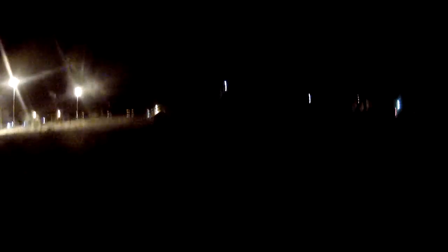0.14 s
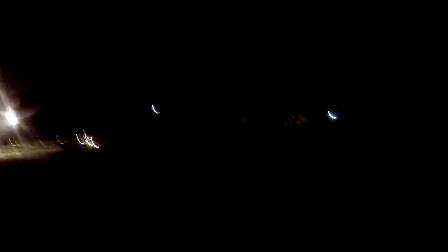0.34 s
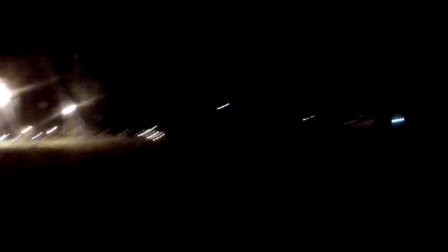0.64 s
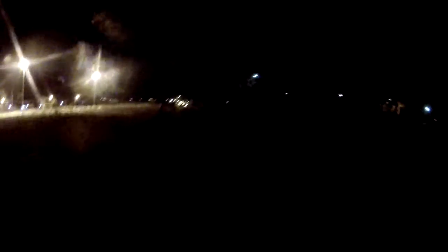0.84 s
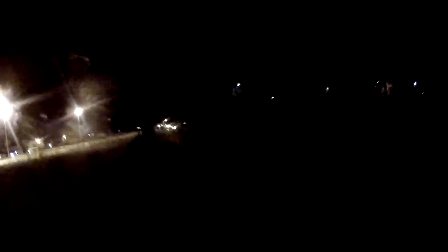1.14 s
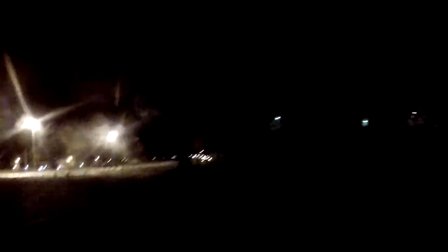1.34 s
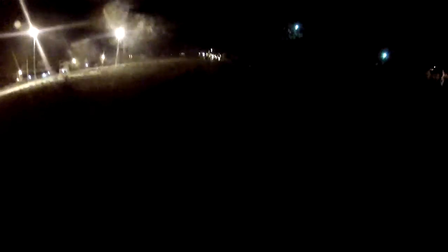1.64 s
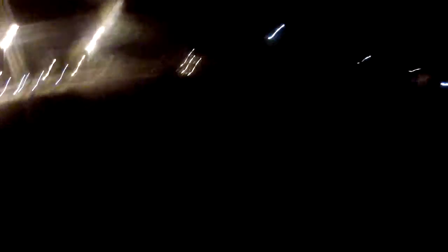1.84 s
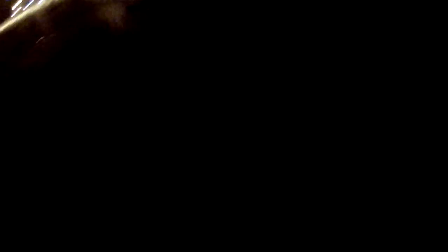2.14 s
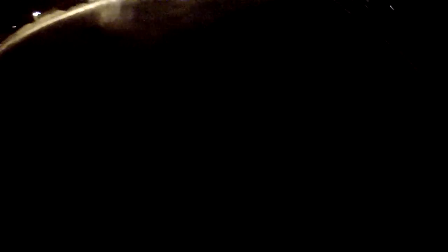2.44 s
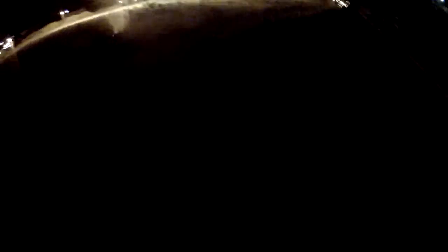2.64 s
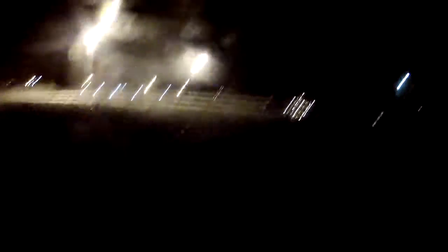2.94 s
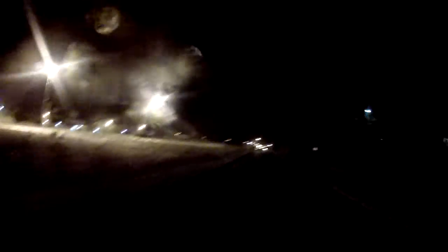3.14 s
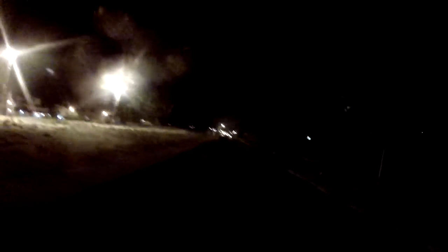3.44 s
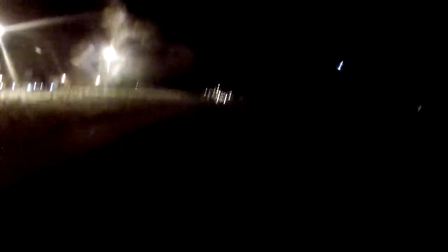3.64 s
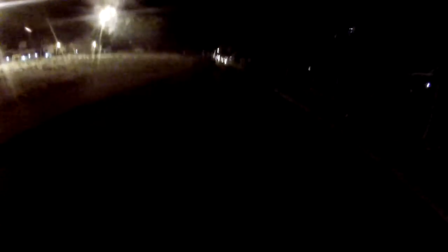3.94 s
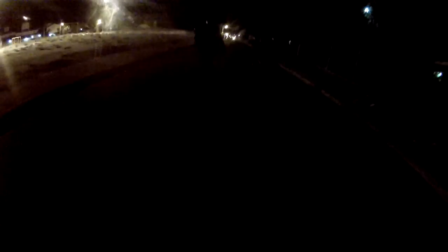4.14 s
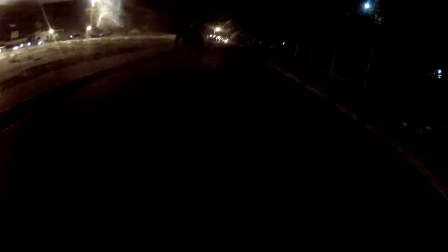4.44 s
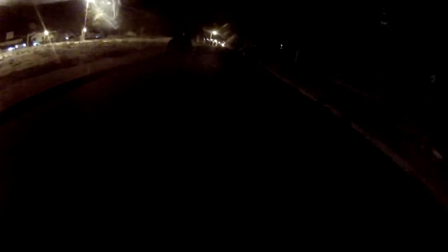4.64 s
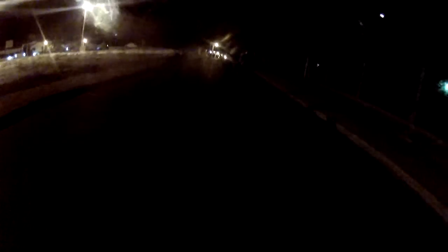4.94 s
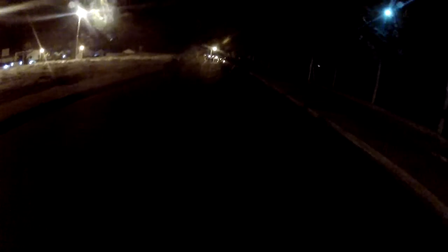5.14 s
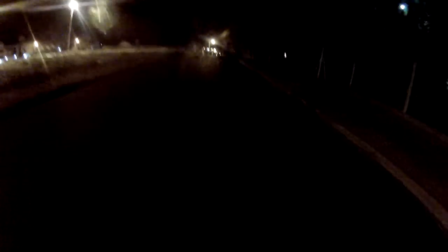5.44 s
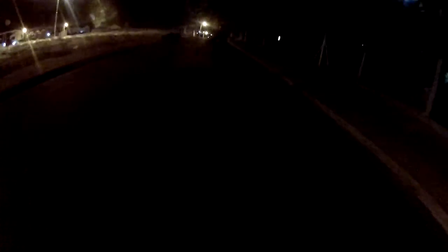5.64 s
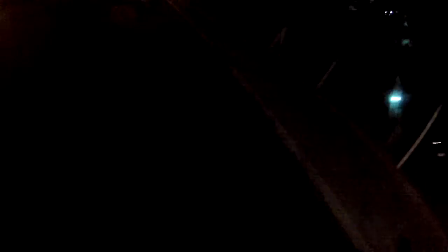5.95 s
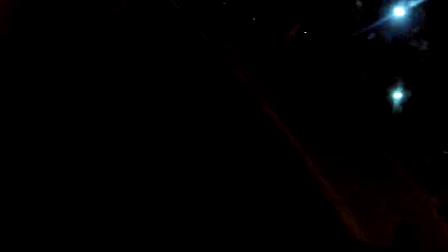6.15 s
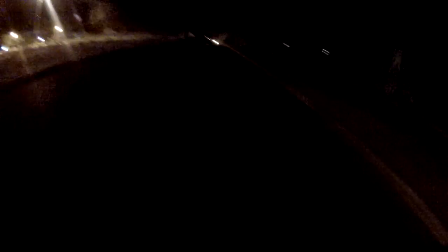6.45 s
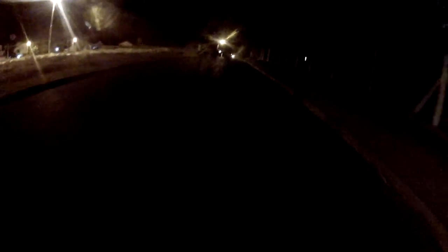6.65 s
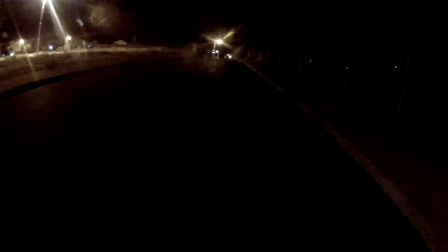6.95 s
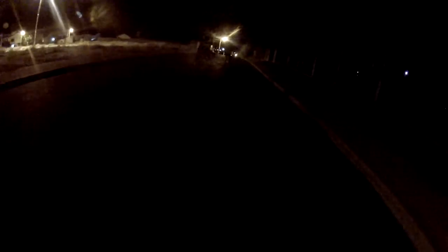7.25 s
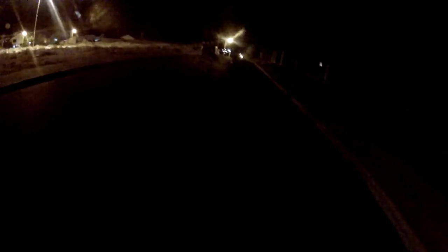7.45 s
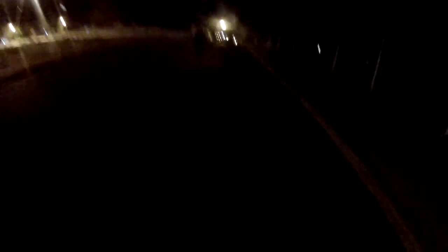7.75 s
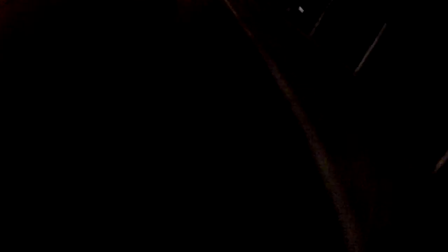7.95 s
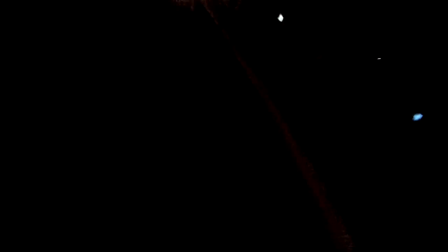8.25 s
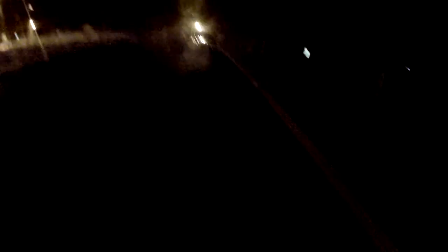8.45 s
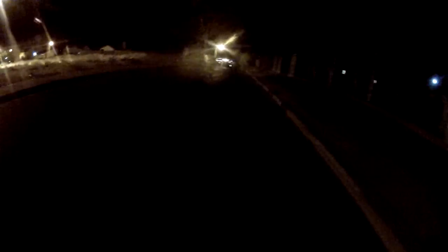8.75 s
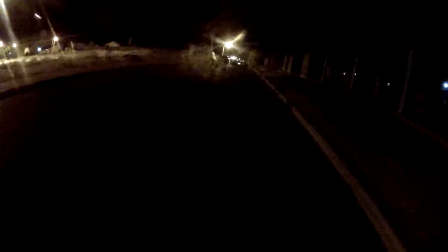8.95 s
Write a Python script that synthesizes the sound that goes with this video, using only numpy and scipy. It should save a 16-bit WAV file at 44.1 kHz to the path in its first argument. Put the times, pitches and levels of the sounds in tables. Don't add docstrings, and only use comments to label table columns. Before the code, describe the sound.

Longboard wheels hum steadily over asphalt while early bumps thump and clack a sealed plastic camera housing, wind rumbling low, with harsh overloaded sound.

```python
import sys
import numpy as np
from scipy import signal
from scipy.fft import rfft, irfft, next_fast_len
from scipy.io import wavfile
from scipy.ndimage import uniform_filter1d

SR = 44100
rng = np.random.default_rng(int(sys.argv[2]) if len(sys.argv) > 2 else 0)


def generate_wav(sig):
    pcm = np.round(np.clip(np.atleast_2d(sig).T, -1, 1) * 32767).astype(np.int16)
    wavfile.write(sys.argv[1], SR, pcm)


def volts_from_db(level):
    exponent = np.asarray(level, float) / 20
    return 10 ** exponent


N = 400869

# (f/Hz, level/dB, time to fall 60 dB/s)
LOW_MODES = [(425, 5, 0.016), (524, 2.5, 0.024), (730, 0, 0.024), (1004, -0.5, 0.025)]
MID_MODES = [(1342, -7, 0.023), (1623, 0.5, 0.015), (1933, 6.5, 0.012), (2295, -2, 0.014)]
HIGH_MODES = [(2547, 10.4, 0.0057), (3250, 0.42, 0.015), (3580, 1.8, 0.011)]
# (t/s, door level/dB, door f/Hz, shell level/dB, hollowness/dB)
SLAMS = [
    (0.2752, 4.5, 272, -10, -4),
    (0.3378, -9.5, 260, -19, 8),
    (1.0238, 3, 266, -12, -0.5),
    (1.1223, 2.5, 262, -12.5, 5.5),
    (1.9023, -2.5, 255, -12.5, -4),
    (3.0152, -3.5, 257, -10, 6.5),
]


def rms_one(x):
    return x / np.sqrt(np.mean(x ** 2) + 1e-20)


def drift(rate):
    r = np.exp(-80 * np.pi * rate / SR)
    noise = rng.standard_normal(N // 40 + 2002)
    slow = signal.lfilter([1], [1, -2 * r, r * r], noise)[2000:]
    return np.interp(np.arange(N) / 40, np.arange(len(slow)), rms_one(slow))


def coloured(source, spectrum):
    size = next_fast_len(N)
    hz, level_db = np.transpose(spectrum)
    bins_hz = np.arange(size // 2 + 1) * SR / size
    shape_db = np.interp(np.log(bins_hz + 1e-9), np.log(hz), level_db, -120, -120)
    return rms_one(irfft(rfft(source, size) * volts_from_db(shape_db), size)[:N])


def ring(force, hz, t60):
    r, w = volts_from_db(-60 / (t60 * SR)), 2 * np.pi * hz / SR
    return signal.lfilter([0, np.sin(w)], [1, -2 * r * np.cos(w), r * r], force + 1e-18)


def shell(force, modes, cut_hz):
    rings = sum(volts_from_db(level_db) * ring(force, hz, t60) * (-1) ** k for k, (hz, level_db, t60) in enumerate(modes))
    return signal.sosfilt(signal.butter(8, cut_hz, fs=SR, output="sos"), rings)


def crackles(count, length_s):
    t = np.arange(2048) / SR
    length_s = np.reshape(length_s, (-1, 1))
    after = rng.standard_normal((count, len(t))) * np.exp(-t / length_s) * (1 - np.exp(-t / 0.00018))
    return (t == 0) + 0.19 * after


def add(out, times, levels_db, sounds):
    for s, level_db, sound in zip(times, levels_db, sounds):
        part = out[round(s * SR):round(s * SR) + len(sound)]
        part += (volts_from_db(level_db) * sound / np.max(np.abs(sound)))[:len(part)]


def soft_blows(rows, rise_s):
    out, t = np.zeros(N + SR), np.arange(SR // 2) / SR
    for s, level_db, hz, t60, *push in rows:
        swing = np.sin(2 * np.pi * hz * t) * volts_from_db(level_db - 60 * t / t60)
        swing *= 1 - np.exp(-t / rise_s)
        swing *= 1 + sum(push) * np.exp(-t / 0.0053)
        out[round(s * SR):round(s * SR) + len(t)] += swing
    return out[:N]


def in_time(rows):
    s, *columns = np.transpose(rows)
    return [np.interp(np.arange(N) / SR, s, c) for c in columns]


def swells(rows):
    return sum(db * np.exp(-((np.arange(N) / SR - s) / width_s) ** 2) for s, db, width_s in rows)


def road(grains_per_s, spread_db, patchy_db):
    sizes = volts_from_db(spread_db * np.minimum(rng.exponential(1, N), 5)) * rng.choice([-1, 1], N)
    return sizes * (rng.random(N) < grains_per_s / SR) * volts_from_db(patchy_db * drift(16.4))


def ride():
    # (t/s, wheel load as hum level/dB, rubbing on the shell level/dB)
    course = [(0.0, -47.5, -51.5), (0.45, -47, -56), (1.21, -48, -52.5), (1.64, -51, -52),
              (2.1, -43, -53.5), (2.58, -44, -57.5), (2.88, -48, -57), (3.37, -47, -42), (3.5, -47, -46.5),
              (3.75, -47, -52.5), (4.23, -44.5, -55.5), (4.91, -43.5, -55.5), (5.69, -44, -55.5),
              (6.13, -40, -53), (7.01, -42, -53.5), (7.37, -45, -53), (7.95, -43.5, -54.5),
              (9.09, -46, -53)]
    # (t/s, level/dB, half width/s)
    strokes = [
        (.75, 4, 0.15),
        (1.5, 5, 0.11),
        (3.3, -2, .04),
        (3.385, 1.5, 0.042),
        (3.46, 1, 0.024),
        (3.61, 1.5, 0.044),
    ]
    hum_db, rub_db = in_time(course)
    rub_db = rub_db + swells(strokes)
    early_rub_db = np.roll(rub_db, -int(0.098 * SR))
    top_db = -65.5 + 0.63 * (early_rub_db - rub_db.mean()) + 0.24 * (hum_db - hum_db.mean())
    return hum_db, rub_db, top_db


def wind():
    # (t/s, level/dB)
    gusts = [(1.97, -33), (2.1, -30), (2.2, -41), (2.5, -47), (3.05, -38), (3.31, -43), (3.56, -42),
             (4.28, -51), (5.29, -47.5), (5.86, -51.5), (6.13, -45), (6.27, -49.5), (6.85, -44.5),
             (7.34, -43), (7.47, -50.5), (8.04, -40), (8.23, -48.5), (9.09, -44.5)]
    # (f/Hz, level per Hz/dB)
    rumble = [(15, -44), (28, -3), (60, 1.5), (85, -4.5), (115, -13), (170, -20), (260, -17.5)]
    return volts_from_db(in_time(gusts)[0] - 1.0 + 4.7 * drift(15.0)) * coloured(rng.standard_normal(N), rumble)


def rubbing(rub_db):
    # (f/Hz, level per Hz/dB)
    upper = [(1350, -7), (1550, -7.5), (1920, -0.5), (2150, -3.5), (2600, -5.5), (2900, -12)]
    lower = [(600, 1), (830, -4.5), (1050, 4), (1200, -1.5), (1350, 0), (1550, -48), (1700, -42)]
    grit = road(9000, 1.9, 1.56)
    return volts_from_db(rub_db - 1.34) * coloured(grit, upper) + volts_from_db(-57.5 + 0.51 * (rub_db + 56.0)) * coloured(grit, lower)


def top_hiss(top_db):
    # (f/Hz, level per Hz/dB)
    treble = [(2600, -27), (2950, -1), (3340, -0.5), (3750, -2.5), (4200, -12.5), (4400, -8)]
    return volts_from_db(top_db + 0.95) * coloured(road(9000, 3.7, 0.73), treble)


def bearings(hum_db, top_db):
    # (t/s, level/dB, half width/s)
    carves = [
        (6.15, 3, 0.33),
        (8.16, 2.5, .15),
    ]
    # (f/Hz, level per Hz/dB)
    bright = [(4000, -22), (4300, -19), (4600, -8), (5050, -5.5), (5300, -2.5), (5480, -3), (6000, -1)]
    level_db = -70.5 + swells(carves) + 0.5 * (hum_db + 47.5) + 0.57 * (top_db + 68)
    return volts_from_db(level_db) * coloured(road(9000, 2.1, 1.2), bright)


def deck_note(hz, waver_db, waver_rate):
    t60_s = 0.038
    note = rms_one(ring(ring(road(4000, 1.86, 1.0), hz, t60_s), hz, t60_s))
    stray = np.cumsum(0.015 * drift(.8))
    place = np.arange(N) + stray - np.linspace(stray[0], stray[-1], N)
    return np.interp(place, np.arange(N), note, period=N) * volts_from_db(waver_db * drift(waver_rate))


def wheels():
    # (f/Hz, level per Hz/dB)
    broad = [(130, -19), (200, -13), (250, -8.5), (275, -9), (340, -7), (375, -7), (450, -9), (530, -6),
             (570, -10), (740, -15), (810, -25), (950, -20.5)]
    # (f/Hz, level over the broad hum/dB)
    neighbours = [(350, -12), (520, -15)]
    ridge_hz, ridge_t60_s = 1920, 0.012
    grains = road(4000, 2.3, 0.6)
    deck = volts_from_db(-1) * deck_note(447, 0.54, 7.9)
    deck = deck + sum(volts_from_db(db) * deck_note(hz, 3.9, 1.04) for hz, db in neighbours)
    ridge = rms_one(ring(ring(grains, ridge_hz, ridge_t60_s), ridge_hz, ridge_t60_s))
    return rms_one(coloured(grains, broad) + deck + volts_from_db(-19.5) * ridge)


def ducking(bumps, depth, release_db_s):
    over_db = np.maximum(20 * np.log10(np.abs(bumps) + 1e-9) + 14, 0)
    slope = release_db_s * np.arange(N) / SR
    held_db = np.maximum.accumulate(over_db + slope) - slope
    return volts_from_db(-depth * uniform_filter1d(held_db, size=200))


def rattle(bumps):
    shake = np.abs(uniform_filter1d(np.abs(np.gradient(bumps)) * SR / 1000, size=200)) ** 0.76
    force = volts_from_db(-41) * shake * road(700, 3, 2)
    low, mid = shell(force, LOW_MODES, 1100), shell(force, MID_MODES, 2730)
    return low + volts_from_db(-2) * mid + volts_from_db(-3.5) * shell(force, HIGH_MODES, 5100)


def ticks():
    # (t/s, peak level/dB)
    events = [(0.24, -50), (0.272, -40), (0.2764, -35), (0.298, -41), (0.311, -47), (0.3397, -32),
              (0.3455, -42), (0.389, -50), (0.407, -50), (0.4304, -40), (0.437, -45), (0.4788, -46),
              (0.492, -48), (0.5935, -42), (1.0195, -44), (1.0261, -33), (1.034, -42), (1.044, -48),
              (1.0535, -42), (1.0864, -37), (1.112, -38), (1.1175, -38), (1.1774, -43), (1.3029, -44),
              (1.316, -46), (1.339, -48), (1.598, -44), (1.624, -44), (1.647, -40), (1.66, -43),
              (1.678, -42), (1.7456, -40), (1.829, -46), (1.8944, -39), (1.908, -35), (1.925, -39),
              (1.953, -45), (1.9655, -34), (2.2763, -38), (2.934, -55), (3.007, -47), (3.022, -31),
              (3.4476, -45), (3.6681, -44), (3.743, -36), (4.128, -51)]
    # (f/Hz, level/dB, time to fall 60 dB/s)
    modes = [(4650, 7.5, 0.0027), (5210, 9, 0.0039), (5820, -5, 0.028)]
    s, peak_db = np.transpose(events)
    out, thin = np.zeros(N), signal.butter(3, 3900, "high", fs=SR, output="sos")
    add(out, s, peak_db - .6, signal.sosfilt(thin, shell(crackles(len(s), 0.0028), modes, 7000)))
    return out


def flicks():
    # (t/s, peak level/dB, dullness as tilt toward the low notes/dB per octave)
    events = [
        (0.456, -40, -3),
        (1.2458, -39, -2),
        (2.0663, -35.5, 2),
        (2.869, -39, -2.5),
        (3.6464, -42, 5.5),
        (4.4238, -36, -2),
        (5.223, -35, 5.5),
        (6.002, -36, 0),
    ]
    # (f/Hz, level/dB, time to fall 60 dB/s)
    modes = [(1050, -14, .015), (1400, -13, .015), (1820, -6, 0.016), (2610, 0, 0.024), (3500, -3, 0.02),
             (4540, -13, 0.012), (5230, -6, 0.02), (5780, -12, .01)]
    s, peak_db, tilt_db = np.transpose(events)
    force, out = crackles(len(s), .001), np.zeros(N)
    shares = volts_from_db(1.5 * rng.standard_normal((len(s), len(modes))))
    rings = 0
    for k, (hz, db, t60) in enumerate(modes):
        strength = shares[:, [k]] * volts_from_db(db + tilt_db[:, None] * np.log2(3600 / hz))
        rings = rings + strength * ring(force, hz, t60) * (-1) ** k
    add(out, s, peak_db + 8.0, signal.sosfilt(signal.butter(1, 700, "high", fs=SR, output="sos"), rings))
    return out


def contacts():
    # (t/s, peak level/dB, hollowness as level of the low notes/dB)
    scuffs = [(0.083, -39, 3), (0.209, -42, -2), (0.2722, -27, -17), (0.2945, -47, -4), (0.317, -45, -3),
              (0.3482, -31, 3), (0.4205, -29, 5), (0.436, -41, 5), (0.491, -49, -6), (0.975, -41, 1),
              (1.0206, -22, -1), (1.035, -31, 8), (1.0805, -35, -4), (1.133, -44, -3), (1.14, -42, -10),
              (1.171, -42, -5), (1.413, -49, -3), (1.6715, -38, 2), (1.734, -37, -1), (1.832, -40, -6),
              (1.914, -31, -4), (1.922, -38, 3), (1.9305, -33, -3), (1.9575, -36, -10), (1.985, -46, 5),
              (3.042, -37, 4), (3.367, -39, -13), (3.385, -34, -11), (3.476, -39.5, 5), (3.582, -41, -5),
              (3.611, -36, -16), (4.04, -40, -4), (4.124, -43, -3), (4.31, -43, -9), (5.305, -42, -5),
              (5.439, -40, 1), (5.723, -42, 0), (5.82, -48, 0), (6.291, -42, -3), (7.012, -39.5, 6)]
    snaps = [(0.0049, -24, 13), (0.097, -45, 10.5), (0.2688, -28, 4.5), (0.3319, -21.5, 3.5),
             (0.389, -36, -4), (0.4171, -31, 5.5), (0.4273, -31.5, -3), (0.48, -37.5, 1.5),
             (0.615, -33.5, -6), (0.8365, -38.5, 4.5), (1.053, -36, 8), (1.0646, -34, 5), (1.073, -31, 6),
             (1.0843, -32.5, 9), (1.0985, -27, 2), (1.1634, -43, 14.5), (1.1896, -27.5, 3),
             (1.324, -33.5, -2), (1.35, -31.5, 3), (1.6062, -30.5, -4), (1.6447, -25, -1),
             (1.6603, -36, 7.5), (1.7613, -36, 6), (1.8475, -33.5, -1), (1.9662, -23.5, -19),
             (1.9729, -17.5, 0), (1.9801, -25, 12.5), (2.278, -38.5, 4), (2.4546, -40, -7), (2.96, -42, 13)]
    clacks = [(0.014, -18.5, 0.5), (0.225, -35, -5), (0.2434, -29, 2), (0.375, -41, 9), (0.5885, -22.5, -1),
              (0.7579, -14.5, -3), (0.8984, -17, -7.5), (0.923, -37, -7), (1.0122, -18.5, -4),
              (1.1046, -14, -20), (1.139, -51, -4), (1.153, -30, 13), (1.336, -19.5, 0),
              (1.595, -20.5, -5.5), (1.7397, -25.5, 0), (1.7523, -27, -1), (1.8104, -21.5, -3),
              (1.8854, -31, 2), (1.895, -22.5, 8.5), (1.9442, -24, -4), (2.9902, -10, -9.5),
              (3.0042, -23.5, 5), (3.026, -24.5, 8), (3.1298, -32, -2), (3.35, -23, 0.5),
              (3.4333, -23, -2.5), (3.711, -30.5, 1), (3.749, -35.5, 3.5), (8.0209, -14, -7.5),
              (8.5169, -6.5, -12.5)]
    rows = [(s + 0.00131, db, low_db, -5, 0.64) for s, _, _, db, low_db in SLAMS]
    rows += [(s, db, low_db, -22.5, 2.1 - 0.5 * (db + 25.0)) for s, db, low_db in clacks]
    rows += [(s, db, low_db, -1.5, 1.8) for s, db, low_db in snaps]
    rows += [(s, db, low_db, -6.5, 1.1) for s, db, low_db in scuffs]
    return rows


def taps():
    s, peak_db, low_db, high_db, contact_ms = np.transpose(contacts())
    force, out = crackles(len(s), np.clip(contact_ms, .2, 9) / 700), np.zeros(N)
    add(out, s, peak_db + low_db - .6, shell(force, LOW_MODES, 1580))
    add(out, s, peak_db + 0.32, shell(force, MID_MODES, 2330))
    add(out, s, peak_db + high_db - .6, shell(force, HIGH_MODES, 5100))
    return out


def door():
    # (t/s, level/dB, f/Hz)
    knocks = [(0.0014, -6.5, 189), (0.096, -14.5, 153), (0.388, -13, 150), (0.4201, -12.5, 181),
              (0.4245, -19, 120), (0.587, -17, 196), (0.6145, -11.5, 177), (0.761, -22, 282),
              (0.797, -23, 147), (0.9202, -17.5, 137), (1.0736, -8, 168), (1.11, -16, 169),
              (1.1542, -17, 240), (1.3328, -5, 207), (1.3372, -7.5, 168), (1.3488, -16.5, 146),
              (1.6056, -18.5, 203), (1.7393, -9.5, 200), (1.76, -15, 150), (1.9553, -15.5, 151),
              (1.977, -4, 245), (2.991, -13, 239), (3.0035, -11.5, 179), (3.138, -16, 168),
              (3.216, -21, 193), (3.35, -24.5, 218.8), (3.433, -23, 202), (3.47, -19, 168),
              (3.712, -20, 215), (8.0207, -25.5, 174), (8.5158, -21, 229)]
    slams = [(s, db, hz, 0.018) for s, db, hz, *_ in SLAMS]
    recoils = [(s + 0.00358, db + 3, 202, 0.008) for s, db, *_ in SLAMS if db > -9]
    rebounds = [(s + 0.0066, db - 13, 142, 0.024) for s, db, *_ in SLAMS]
    light = [(s, db, hz, 3.9 / hz) for s, db, hz in knocks]
    return soft_blows(slams + recoils + light, 0.0014) - soft_blows(rebounds, 0.0018)


def shut_in_air():
    # (t/s, level/dB, f/Hz, time to fall 60 dB/s, extra first shove as share; below 0 it swells in)
    thumps = [(0.01, -6, 64, 0.061, 1), (0.0407, -13, 60.7, 0.093, .5), (0.096, -17.5, 70.0, 0.076, -0.5),
              (0.1187, -19, 59.5, 0.19, .5), (0.282, -7, 70.6, 0.14, 4.5), (0.3374, 12, 82, 0.038, -0.03),
              (0.3967, -13, 52.7, 0.13, 1.3), (0.4295, -2, 85, 0.13, 0.4), (0.4528, -20, 98, 0.087, -1),
              (0.6233, -13, 55.3, 0.2, -0.1), (0.9109, -4.5, 64, 0.088, -0.1), (1.0, -22, 63.6, 0.19, 2),
              (1.0308, -6, 63, 0.13, 4), (1.0822, 5.5, 84.5, 0.08, -0.74), (1.1277, -6, 65.6, 0.12, 6),
              (1.1745, -13.5, 79, 0.16, 0.8), (1.3397, -6, 50.7, 0.09, 0.8), (1.6216, -8.5, 66, 0.13, -0.5),
              (1.7471, -5, 71, 0.049, .5), (1.82, -11.5, 57, 0.28, .5), (1.849, -15, 70, 0.14, 1),
              (1.9097, -4, 65.3, 0.17, 4), (1.9754, 3.5, 83.8, 0.084, 1.8), (3.0209, -7, 62.4, 0.049, 1.5),
              (3.0462, -20, 61, 0.24, 0.5), (3.1365, -18.5, 53, 0.18, 1), (3.375, -19.5, 55, 0.18, .5),
              (3.4633, -24.5, 101, 0.13, .5), (3.7324, -12, 54, 0.19, .5), (8.022, -25, 65, 0.086, 0),
              (8.523, -19, 102, 0.023, .5)]
    sways = [(s + 0.0271, -22 - 0.45 * (hz - 66), 61.2, 0.11, .3) for s, db, hz, *_ in thumps if db > -7]
    return soft_blows(thumps + sways, 0.0029)


def scene():
    hum_db, rub_db, top_db = ride()
    steady = wind() + volts_from_db(hum_db + 0.06) * wheels()
    steady = steady + rubbing(rub_db) + top_hiss(top_db) + bearings(hum_db, top_db)
    knocks, thumps = volts_from_db(5.0) * door(), -volts_from_db(3.0) * shut_in_air()
    steady = steady * ducking(knocks + thumps, 0.42, 190.0)
    mono = knocks + thumps + rattle(knocks + 0.074 * thumps) + taps() + ticks() + flicks() + steady
    return np.array([mono, mono])


def band_limit(x):
    return signal.sosfilt(signal.butter(12, 16500, fs=SR, output="sos"), x)


def record(dry):
    hold_rate, out_rate = 12000, 48000
    capsule = signal.sosfilt(signal.butter(1, 14.0, "high", fs=SR, output="sos"), dry[0])
    overloaded = np.clip(0.98 * capsule, -1, 1)
    flat = signal.sosfiltfilt(signal.butter(8, 5850, fs=SR, output="sos"), overloaded)
    slow = signal.resample_poly(flat, hold_rate // 300, SR // 300)
    held = np.repeat(slow, out_rate // hold_rate)
    held = signal.resample_poly(held, SR // 300, out_rate // 300)[:N]
    hiss = np.gradient(rng.standard_normal(N)) * uniform_filter1d(np.abs(held), size=1000)
    unlike = volts_from_db(-39.5) * drift(7.8) * held + volts_from_db(-55) * hiss
    pair = np.clip(volts_from_db(.4) * np.array([held + unlike, held - unlike]), -1, 1)
    mix = signal.sosfiltfilt(signal.cheby2(12, 50, 16100, fs=SR, output="sos"), pair)
    return band_limit(mix)


dry = scene()
out = record(dry)
generate_wav(out)
```